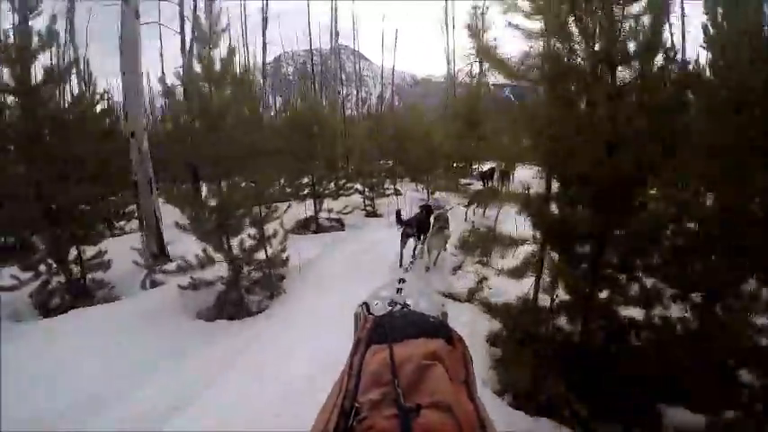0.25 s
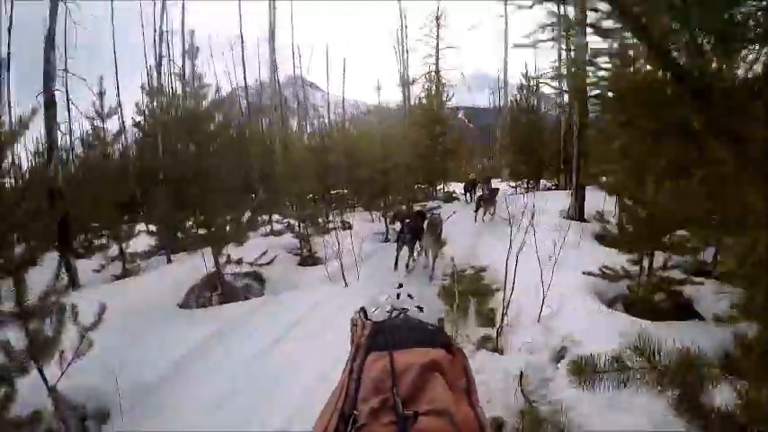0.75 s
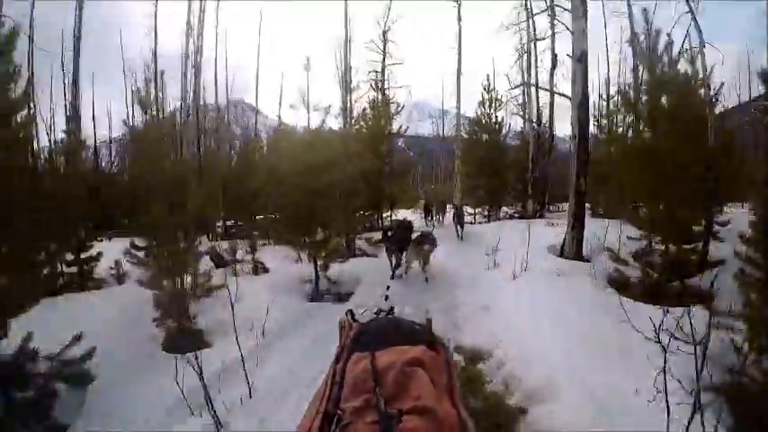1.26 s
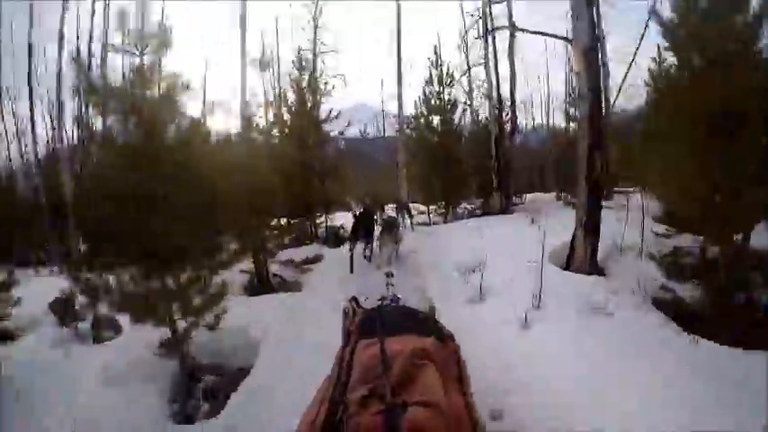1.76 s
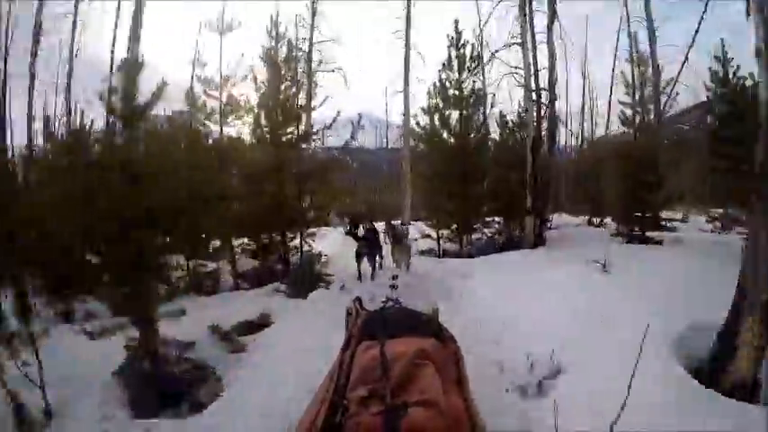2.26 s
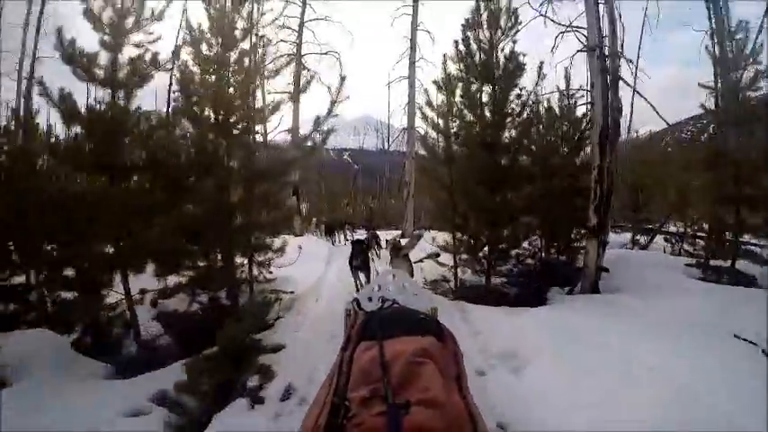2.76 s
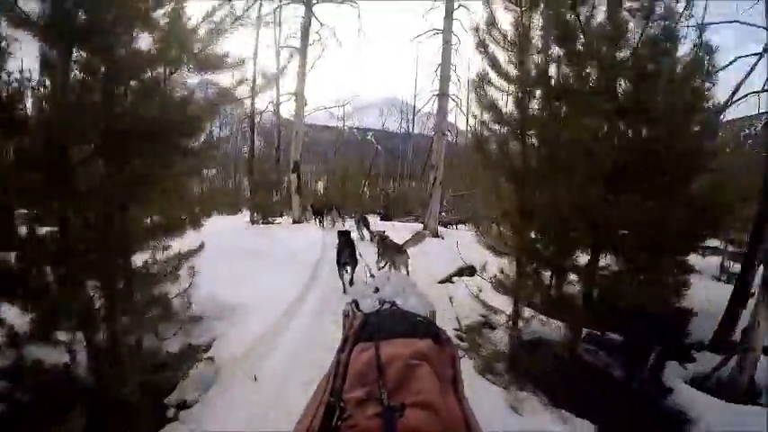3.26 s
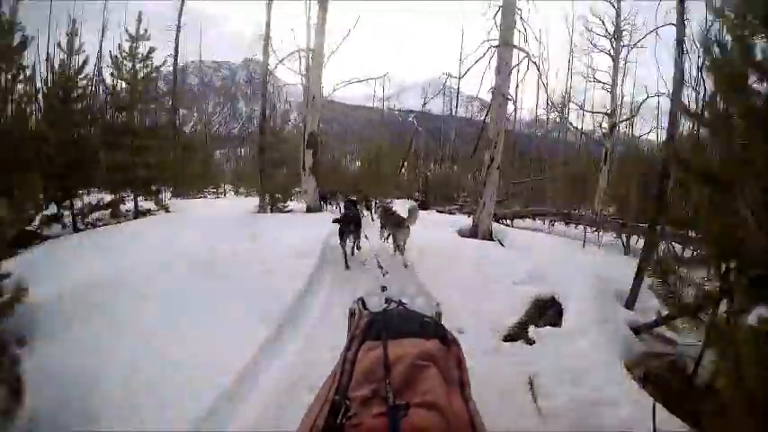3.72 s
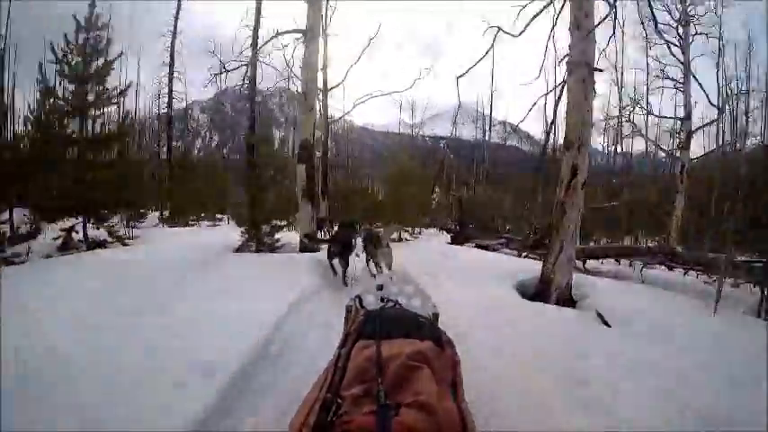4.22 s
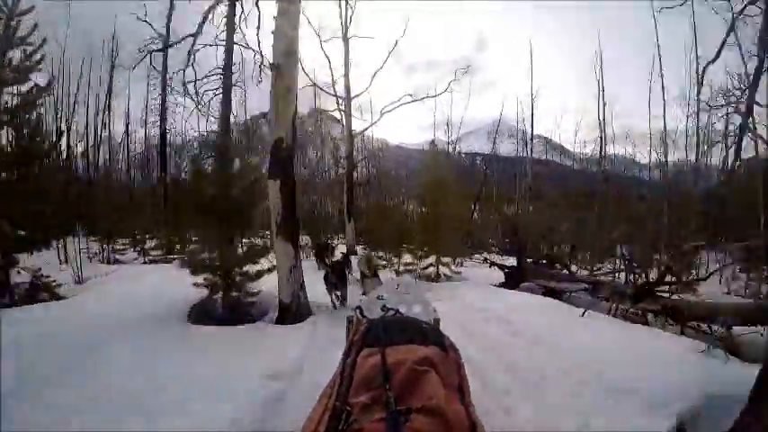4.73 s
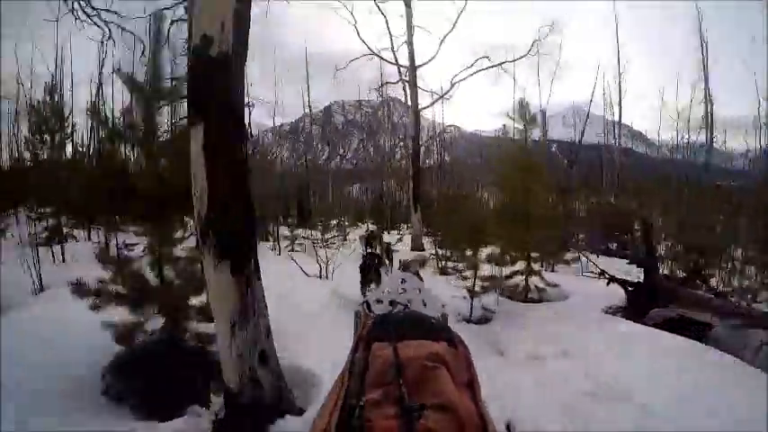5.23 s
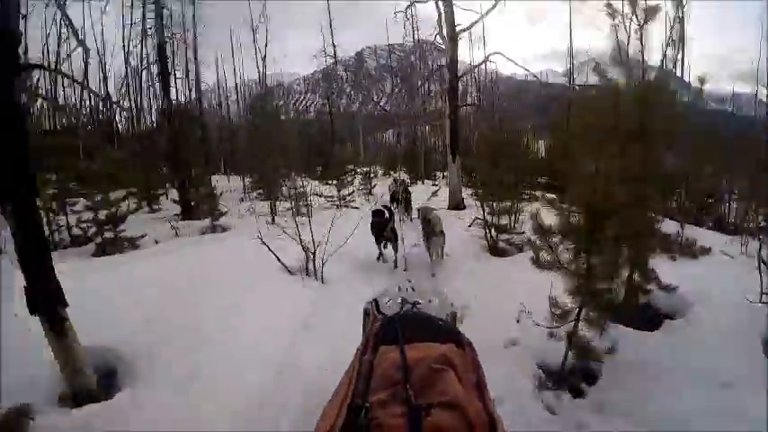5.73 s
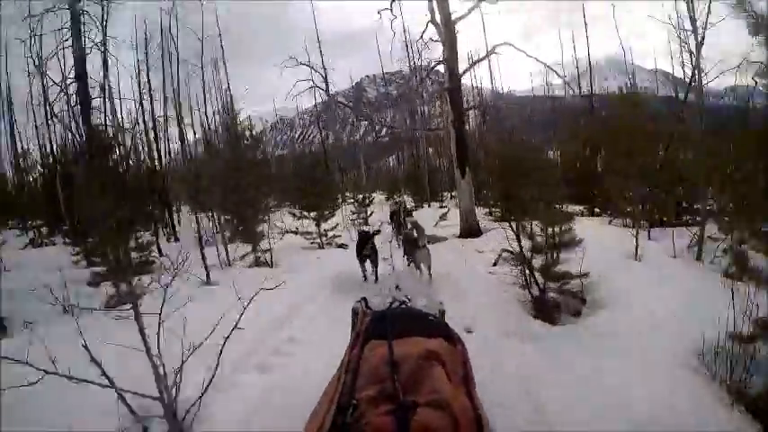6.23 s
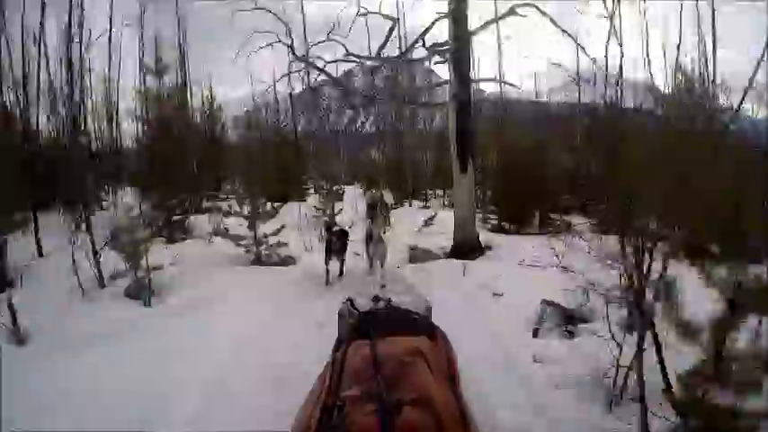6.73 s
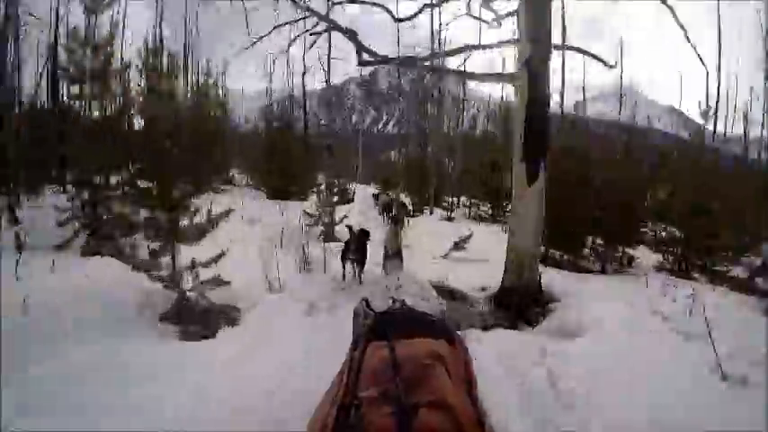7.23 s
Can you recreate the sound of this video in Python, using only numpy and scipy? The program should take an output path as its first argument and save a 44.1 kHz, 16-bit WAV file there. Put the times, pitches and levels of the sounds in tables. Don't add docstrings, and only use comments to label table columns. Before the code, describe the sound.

Close, dry, gritty crunch of sled runners on icy snow, surging and thinning over a bumpy rumble, with thumps, clacks and a hard overloaded bang.

```python
import sys
import numpy as np
from scipy import signal
from scipy.fft import rfft, irfft, next_fast_len
from scipy.io import wavfile
from scipy.ndimage import uniform_filter1d

SR = 44100
rng = np.random.default_rng(int(sys.argv[2]) if len(sys.argv) > 2 else 0)


def file_out(sig):
    cols = np.atleast_2d(sig).T
    lim = np.clip(cols, -1, 1)
    pcm = np.round(lim * 32767).astype(np.int16)
    wavfile.write(sys.argv[1], SR, pcm)


def volts(x):
    e = np.asarray(x, float) / 20
    return 10 ** e


N = 329868

# (pitch [Hz], width [Hz], level [dB])
FRAME_RINGS = [(318.5, 57, -9), (446, 54, -26), (499.5, 136, -4.5), (624, 110, -2), (692.5, 120, -1),
               (190, 68, -13)]
# (pitch [Hz], width [Hz], level [dB])
SHELL_RINGS = [(1031, 193, -5.5), (1164, 250, -8), (1533, 368, -2), (1798, 187, 0.5), (1951, 178, 2),
               (2060, 357, -0.5), (2478, 387, -3.5), (2724, 207, -2)]
# (pitch [Hz], width [Hz], level [dB])
UPPER_RINGS = [(3243, 67, -0.5), (3555, 260, 2), (3823, 260, 0), (4324, 246, -4.5), (4780, 320, -13)]
# (pitch [Hz], width [Hz], level [dB])
SPRAY_RINGS = [(6990, 850, 9), (8950, 390, -8), (10760, 1100, -4), (12800, 3500, -7)]
# (time [s], peak [dB], frame share
# [dB], upper share [dB], length [s])
KNOCKS = [(0.957, -7, -16, -15, 0.0043), (0.439, -8, -3, -18, 0.01), (1.574, -15, -24, -26, 0.0049),
          (1.755, -1.5, -27, -20, 0.0039), (1.937, -5.5, -24, -13, 0.0015), (1.9766, -4, -8, -8, 0.0074),
          (5.071, -14, -1, -14, 0.014), (2.692, 0, -32, -9, 0.0054), (3.038, -8, -4, -31, 0.004),
          (3.87, -4, -21, -12, 0.0045), (3.907, -1.5, -20, -9.5, 0.0074), (3.98, 1.5, -11.5, -11, 0.0043),
          (4.104, -1, -25.5, -14.5, 0.008), (4.141, -1, -20, -14.5, 0.0059), (4.443, -8, -8, -15, 0.0076),
          (4.482, -10, -10, -16, 0.0083), (5.143, -8, -5, -23.5, 0.0045), (5.164, -11.5, -0.5, -24, 0.0051),
          (5.183, -6.5, -21, -16, 0.0037), (6.266, -15, -19, -21, 0.0045), (6.662, -2.5, -9, -26, 0.0046),
          (7.408, -3.5, -22, -13, 0.0084),
          (1.752, -6, -2, -17, .016),
    (4.7712, -2, -13, -18, .0012),
    (5.801, -8, -14, -17, .03),
    (5.862, -10, -10, -16, .02),
]


def runners():
    pressure_db, edging_db, spray_db = contact()
    frame_db = -4 - 0.85 * edging_db
    upper_db = -15 + 0.85 * edging_db
    time, peak_db, frame_share_db, upper_share_db, length = np.transpose(KNOCKS)

    crust_db = 0.96 * walk(21) + 0.77 * walk(60)
    load_db = pressure_db + crust_db
    shared = crystals(9000, 1.5)
    frame_level_db = pressure_db + frame_db + 0.76 * crust_db + 0.65 * walk(20) - 1.46
    frame = volts(frame_level_db) * crystals(5000, 3.04)
    shell = volts(load_db + 1.17 * walk(11) - 0.22) * shared
    upper_level_db = load_db + upper_db + 1.3 * walk(25) - 0.6
    upper = volts(upper_level_db) * (0.44 * shared + 0.79 * crystals(7000, 0.77))
    spray_level_db = spray_db + 0.4 * crust_db + 1.1 * walk(13) + 4.0
    spray = volts(spray_level_db) * crystals(12000, 2.8)

    frame = frame + bursts(time, peak_db + frame_share_db - 4, 1.2 * length)
    shell = shell + bursts(time, peak_db - 9.5, length)
    upper = upper + bursts(time, peak_db + upper_share_db - 12.5, length)
    inside = ring(frame, FRAME_RINGS, 1.285) + ring(shell, SHELL_RINGS, 2.48) + ring(upper, UPPER_RINGS, 1.48)

    seal = signal.butter(4, 6150, fs=SR, output="sos")
    return signal.sosfilt(seal, inside) + ring(spray, SPRAY_RINGS, 1.8)


# (pitch [Hz], width [Hz], level [dB])
EDGE_RINGS = [(5620, 680, 0.5), (5866, 820, -2.5), (6680, 400, -15.5)]


def edges():
    pressure_db, edging_db, _ = contact()
    cut_db = pressure_db - 23 + 1.2 * edging_db
    shaving = volts(cut_db - 0.5 + 0.75 * walk(23) + 1.1 * walk(60)) * crystals(8000, 1.3)
    return ring(shaving, EDGE_RINGS, 2.7)


# (time [s], runner pressure [dB], edging from flat to up on the edge [dB], snow spray [dB])
RIDE = [(0, -18, 1.5, -61), (.33, -29.5, 2, -71), (.62, -20, 0.5, -63), (.9, -19, -1.5, -62.5),
        (1.06, -26.5, 1, -67.5), (1.7, -24, -4, -74.5), (2.2, -24, 3.5, -68), (2.75, -18, 4.5, -65),
        (3.0, -20.5, -1, -64.5), (3.2, -15, 0.5, -62.5), (3.58, -26, 0, -61), (3.8, -17.5, 2, -58.5),
        (4.55, -18.5, 3.5, -63), (4.75, -26, -2, -61.5), (5.15, -29, 1, -69.5), (5.65, -37, -1, -73),
        (6.55, -24, 1, -67), (7.48, -24.5, 3, -60.5)]
# (time [s], length [s], pressure change [dB], edging change [dB])
CRUSTS = [(0.054, 0.035, -1, 1.3), (0.373, 0.066, 3, -3), (0.435, 0.11, 4, 1.5), (0.708, 0.14, 3, 2),
          (.9, 0.018, -4.5, 0), (0.945, 0.033, 3.5, 2), (1.1, 0.022, 2, 2), (1.38, 0.12, 1.5, 0),
          (1.551, 0.056, 4, 1), (1.759, .14, 7, 1.5), (1.946, 0.15, 3.5, 1.5), (2.556, 0.11, 1, -2.5),
          (2.773, 0.057, 2, -1.5), (3.165, .04, -2, -1.2), (3.312, 0.05, -0.5, -3), (3.938, 0.16, 1.5, 0.4),
          (4.412, 0.08, 1.5, 0.5), (4.64, 0.038, 2, 1.5), (4.898, 0.15, 1, -3.5), (5.06, 0.076, 2, -1),
          (5.3, 0.032, 2, 1.7), (5.687, 0.074, 1.5, -2), (5.798, 0.6, 4, 1), (5.8, 0.077, 8, 3.2),
          (5.973, 0.11, 6, 0.5), (6.155, 0.11, 5, 2.5), (6.598, .85, 4.5, 1), (6.633, 0.26, 1.5, 1.5),
          (6.944, 0.054, 1.5, 0), (7.203, .24, 2.5, 0)]


def contact():
    pressure_db, edging_db, spray_db = columns(RIDE)
    rise_s, fall_s = 0.01, 0.063
    t = np.arange(N) / SR
    for time, length, harder_db, sharper_db in CRUSTS:
        corners = np.cumsum([time - rise_s / 2, rise_s, length, fall_s])
        on = np.interp(t, corners, [0, 1, 1, 0])
        pressure_db = pressure_db + harder_db * on
        edging_db = edging_db + sharper_db * on
        spray_db = spray_db + 0.3 * harder_db * on
    return pressure_db, edging_db, spray_db


# (pitch [Hz], width [Hz], level [dB])
BOUNCE_RINGS = [(21.64, 3.3, 1), (29.5, 11.5, 2), (43.5, 7, -4.5)]
# (pitch [Hz], width [Hz], level [dB])
SHUDDER_RINGS = [(59.1, 27, 5), (80, 26.4, 3.5), (95, 15, -9)]
# (pitch [Hz], width [Hz], level [dB])
BAR_RINGS = [(243.8, 20, 0)]
# (time [s], bounce level [dB])
LURCHES = [(0.1, -15), (0.4, -17), (0.54, -11.0), (0.64, -15), (0.81, -11.5), (1.38, -14), (1.52, -16),
           (1.73, -15), (1.93, -13), (2.32, -18), (2.46, -17.5), (2.61, -12.5), (2.85, -16), (3.11, -12.0),
           (3.24, -16), (3.34, -13.5), (3.7, -12.5), (3.81, -13), (3.97, -13.5), (4.27, -10.5),
           (4.5, -18.0), (5.63, -18.5), (5.9, -12), (6.12, -15.5), (6.26, -11), (6.4, -18.5), (6.57, -10),
           (6.71, -11.5), (6.98, -14.0), (7.19, -16.0)]
# (time [s], shudder level [dB])
RUTS = [(0.02, -13), (0.53, -20), (0.62, -21.5), (0.71, -18.5), (1.0, -20.5), (1.68, -12), (1.76, -12),
        (1.88, -13.5), (1.99, -17), (2.18, -18), (2.43, -22), (2.8, -14.5), (3.08, -18), (3.459, -23.5),
        (3.67, -17), (3.81, -14.5), (3.89, -14.5), (4.01, -14), (4.2, -14), (4.42, -11), (4.51, -12),
        (4.89, -22.5), (5.83, -16.5), (5.99, -18.0), (6.09, -18.5), (6.26, -19.5), (6.51, -20.0),
        (6.69, -18), (6.92, -18.0), (7.31, -24)]
# (time [s], hum level [dB])
JOLTS = [(0.55, -17.5), (0.73, -22), (0.81, -18), (1.48, -29), (1.77, -23.5), (1.92, -27), (2.1, -33),
         (2.27, -32), (2.52, -36), (2.63, -31.5), (2.78, -29.5), (3.16, -24), (3.44, -31), (3.52, -28),
         (3.67, -33), (3.99, -25.5), (4.23, -27.5), (4.45, -24), (4.62, -29), (4.78, -33), (5.17, -32),
         (5.83, -27.5), (6.03, -27), (6.17, -22), (6.31, -39), (6.51, -29), (6.69, -26.5), (6.91, -24.5),
         (7.1, -32.5), (7.2, -30.5)]


def rocking():
    pressure_db = contact()[0]
    bounce_db = swells(LURCHES, 119, 108.5, pressure_db - 0.5)
    shudder_db = swells(RUTS, 117.5, 102, pressure_db - 6)
    bar_db = swells(JOLTS, 148.5, 121.5, pressure_db - 14)

    bounce = evened(ring(rng.standard_normal(N), BOUNCE_RINGS, 1.71), 0.73)
    bounce = bounce * volts(bounce_db + 1.0 + 0.25 * walk(8.5))
    shudder = evened(ring(crystals(300, 6.1), SHUDDER_RINGS, 1.97), 0.64)
    shudder = shudder * volts(shudder_db - 0.2 + 0.53 * walk(7.9))
    bar = evened(ring(crystals(600, 1.9), BAR_RINGS, 1.38), 0.41) * volts(bar_db - 0.24)

    t = np.arange(N) / SR
    still = np.ones(N)
    for time, *_ in BUMPS[:3]:
        still *= 1 - 0.85 * np.exp(-((t - time - 0.02) / 0.035) ** 4)
    return (bounce + shudder) * still + bar


# (time [s], peak [dB], first pitch [Hz], last pitch [Hz], glide [s])
BUMPS = [
    (0.883, 2.5, 116, 21.8, 0.011),
    (4.777, -4.5, 81, 20.3, 0.029),
    (5.0614, 13.5, 190, 49, 0.0046),
    (5.0728, -8, 53.4, 46, 0.027),
    (5.814, -10, 71, 34.2, 0.036),
    (1.752, -5.5, 136.5, 39.7, 0.0087),
]


def bumps():
    out = np.zeros(N)
    t = np.arange(SR // 4) / SR
    for time, peak_db, first_hz, last_hz, glide in BUMPS:
        turns = last_hz * t + (first_hz - last_hz) * glide * (1 - np.exp(-t / glide))
        swell = (1 - np.exp(-t / 0.0062)) * np.exp(-t / (1.4 * glide))
        start = int(time * SR)
        out[start:start + len(t)] += volts(peak_db + 5.5) * -np.sin(2 * np.pi * turns) * swell
    return out


# (time [s], peak [dB], pitch [Hz], length [s])
TICKS = [(.8205, -39, 8200, .0007), (.9342, -19.5, 7600, .0008), (.938, -35, 7800, .003),
         (.9443, -27, 7500, .0008), (1.7534, -42, 8500, .0007), (1.8337, -47, 8000, .0007),
         (1.9894, -42, 8000, .0007), (2.8479, -44, 8000, .0007), (3.1248, -45, 8000, .0007),
         (3.9799, -41, 8500, .0007), (4.2173, -42, 8000, .0007), (4.3725, -48, 8000, .0007),
         (5.0602, -29, 6000, .0008), (5.0622, -25, 4500, .0008), (5.0688, -22.5, 3500, .001)]
# (time [s], peak [dB], pitch [Hz], decay [s])
CRACKS = [
    (4.7712, -6, 650, .0012),
    (5.0592, -2, 2100, .0016),
    (5.0622, 9, 1700, .0011),
    (5.0682, 5, 800, .0013),
    (5.0696, -9, 2600, .0014),
    (5.0606, -13, 4600, .0012),
    (5.0702, -13, 4600, .001),
    (.9343, -13, 3600, .0008),
    (1.7532, -4, 1800, .002),
]


def fittings():
    times, peaks_db, pitches_hz, lengths = np.transpose(TICKS)
    bright = [(5500, 4000, 0), (9000, 5000, 0), (14300, 1500, -5)]
    out = ring(bursts(times, peaks_db - 3, lengths), bright, 1.4)
    tick_rings = [(time, db + 1, hz, 0.0011) for time, db, hz in zip(times, peaks_db, pitches_hz)]
    t = np.arange(1024) / SR
    for time, peak_db, hz, decay in tick_rings + CRACKS:
        wave = np.sin(2 * np.pi * hz * t) * (1 - np.exp(-t / 0.0002)) * np.exp(-t / decay)
        start = int(time * SR)
        out[start:start + 1024] += volts(peak_db) * wave
    return out


def crystals(per_s, spread_db):
    breaks = rng.random(N) < per_s / SR
    size_db = spread_db * np.minimum(rng.exponential(size=N), 3.5)
    x = breaks * rng.standard_normal(N) * volts(size_db)
    return x / np.std(x)


def bursts(times, peaks_db, lengths):
    out = np.zeros(N + 4096)
    noise = rng.standard_normal((len(times), 4096))
    t = np.arange(4096) / SR
    for time, peak_db, length, grit in zip(times, peaks_db, lengths, noise):
        length = max(length, 1e-4)
        shape = np.minimum(10 * t / length, 1) * np.exp(-t / length)
        start = int(time * SR)
        out[start:start + 4096] += volts(peak_db) * grit * shape
    return out[:N]


def ring(x, modes, steep):
    size = 1 << 15
    hz = np.arange(size // 2 + 1) * SR / size + 0.5
    power = 0
    for pitch, width, db in modes:
        power = power + volts(2 * db) / (1 + ((hz - pitch * pitch / hz) / width) ** 2) ** steep
    cepstrum = irfft(0.5 * np.log(power + 1e-12))
    cepstrum[1:size // 2] *= 2
    cepstrum[size // 2 + 1:] = 0
    response = irfft(np.exp(rfft(cepstrum)))[:size // 2]
    return signal.fftconvolve(x, response / np.sqrt(np.sum(response ** 2)))[:N]


def evened(x, firm):
    swing = np.abs(signal.hilbert(x, next_fast_len(N)))[:N]
    x = x / (swing + 0.23) ** firm
    return x / np.std(x)


def swells(table, rise_db_s, fall_db_s, rest_db):
    times, peaks_db = np.transpose(table)[:, :, None]
    step = np.arange(0, N, 64) / SR
    late = step - times
    tents_db = peaks_db - np.where(late < 0, -rise_db_s, fall_db_s) * late
    return np.maximum(np.interp(np.arange(N) / SR, step, tents_db.max(axis=0)), rest_db)


def walk(rate):
    hold = int(SR / rate)
    levels = np.repeat(rng.standard_normal(N // hold + 1), hold)
    return 1.06 * uniform_filter1d(uniform_filter1d(levels, hold), hold)[:N]


def columns(table):
    times, *rest = np.transpose(table)
    return [np.interp(np.arange(N) / SR, times, column) for column in rest]


def scene():
    return (runners() + edges() + rocking() + bumps() + fittings())[None, :]


def low_pass(x):
    return signal.sosfilt(signal.butter(12, 15250, fs=SR, output="sos"), x)


def record(dry):
    flat = dry / (1 + np.abs(dry / 0.96) ** 30) ** (1 / 30)
    mix = signal.sosfilt(signal.butter(12, 15000, fs=SR, output="sos"), flat)
    return low_pass(mix)


dry = scene()
out = record(dry)
file_out(out)
```